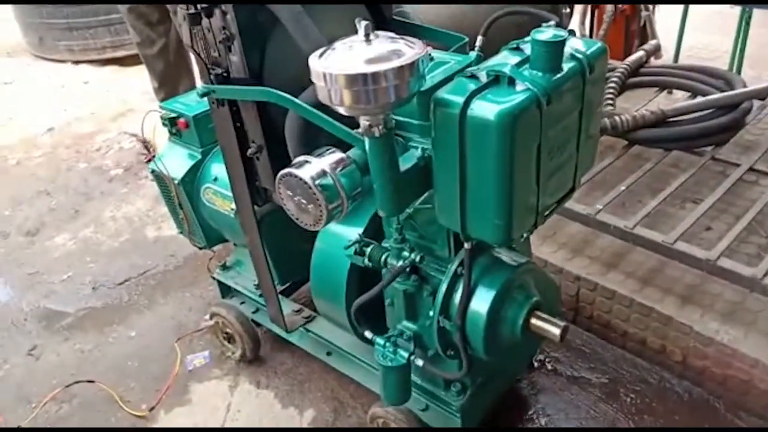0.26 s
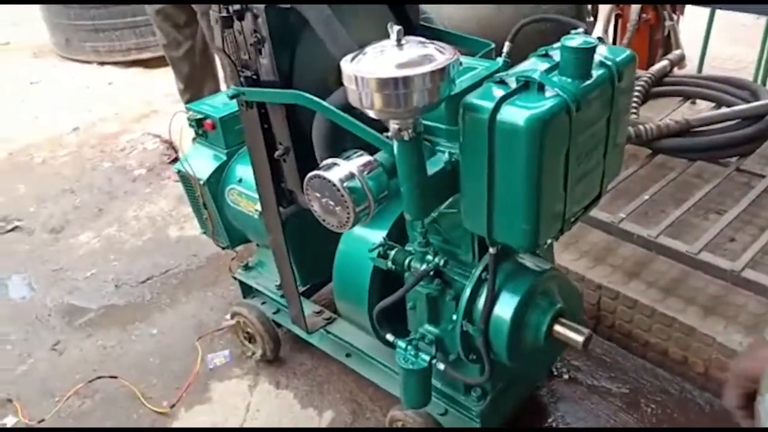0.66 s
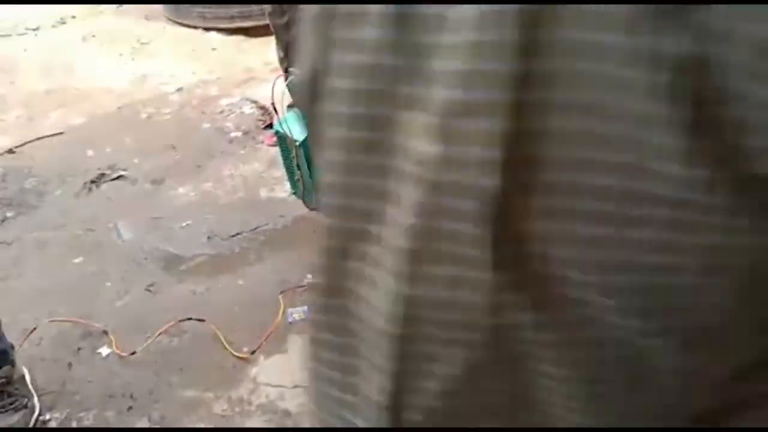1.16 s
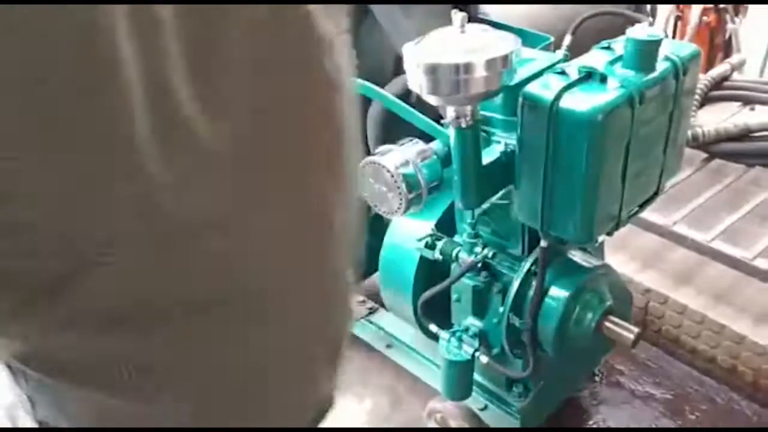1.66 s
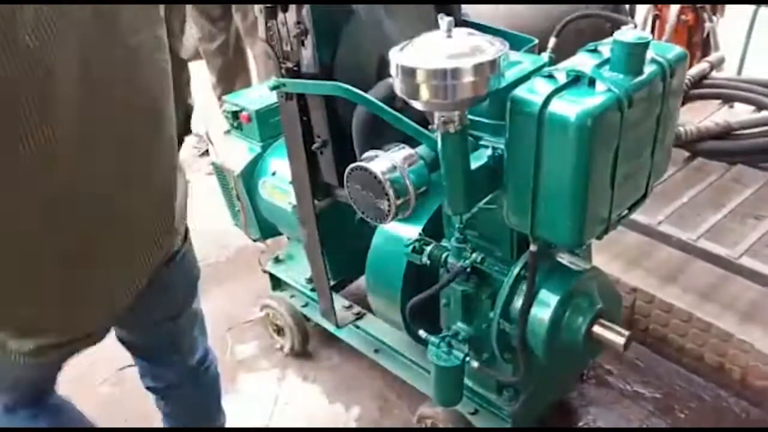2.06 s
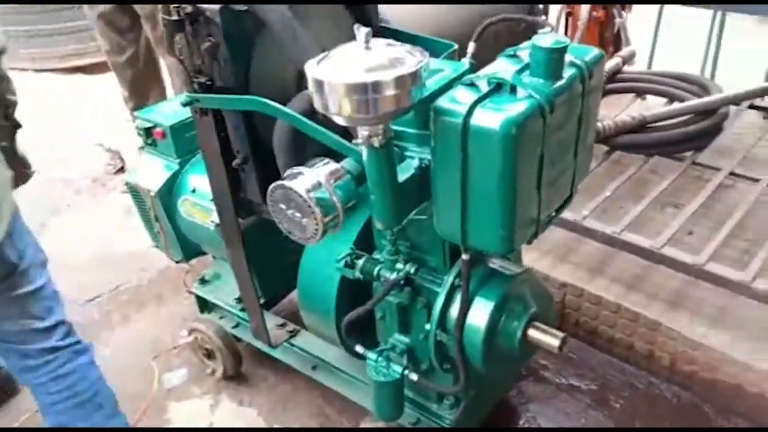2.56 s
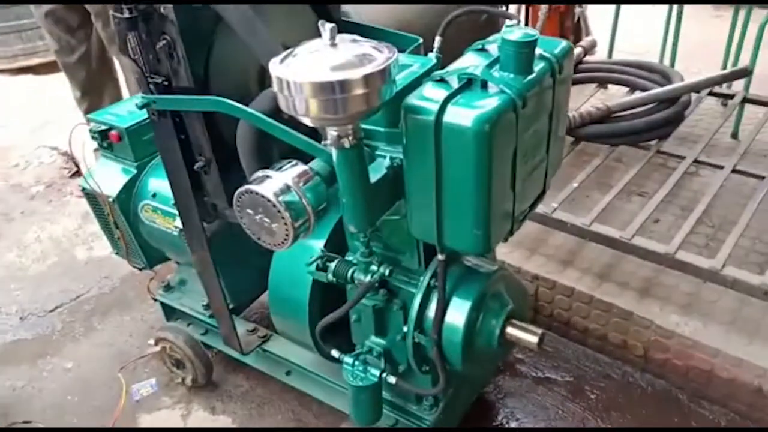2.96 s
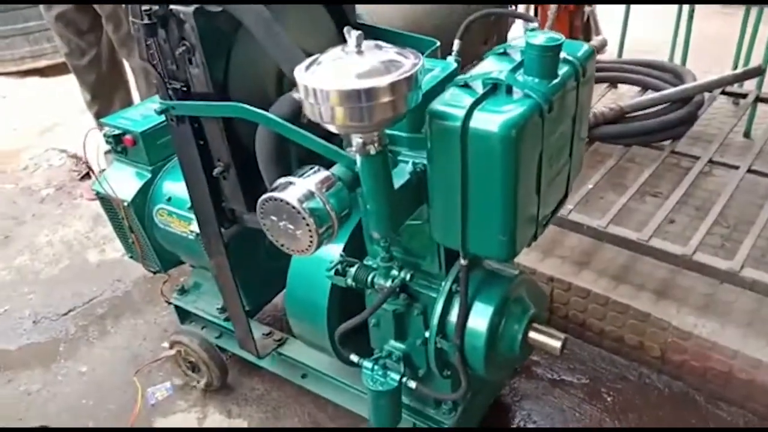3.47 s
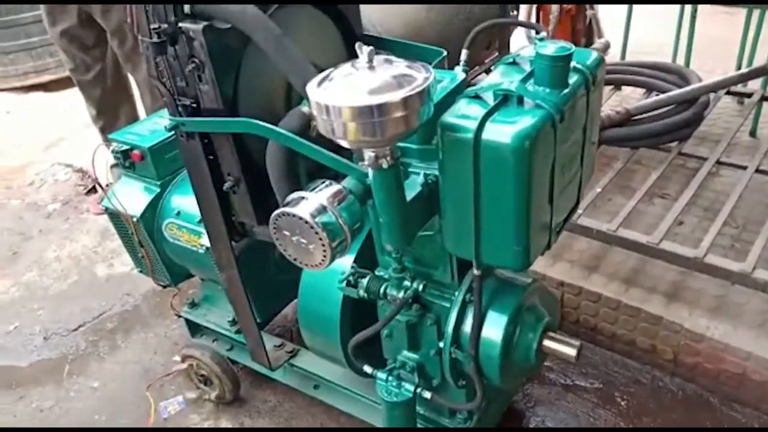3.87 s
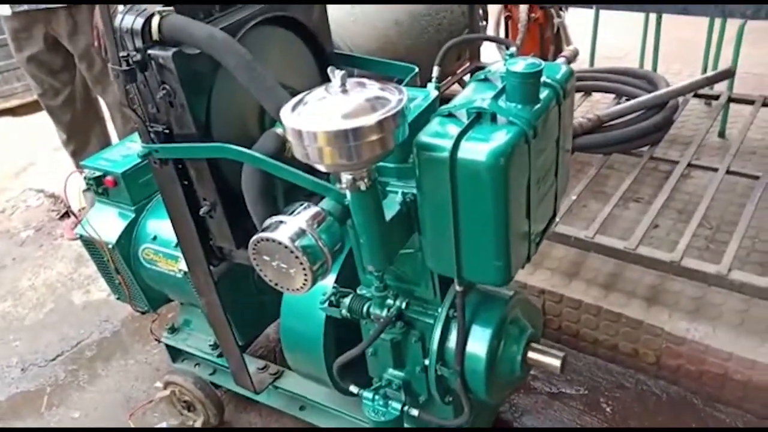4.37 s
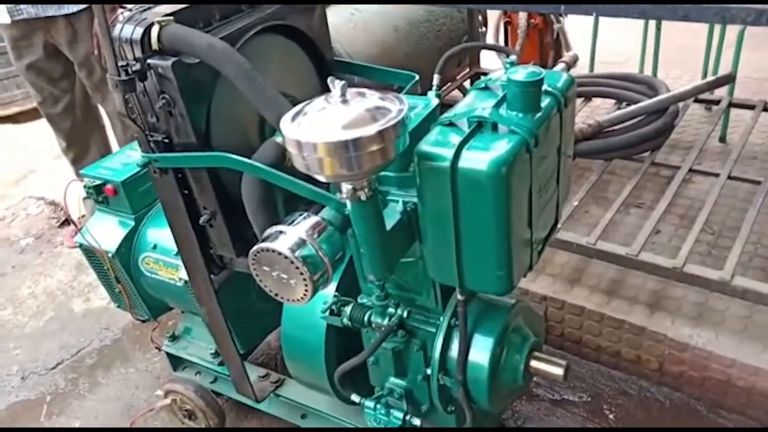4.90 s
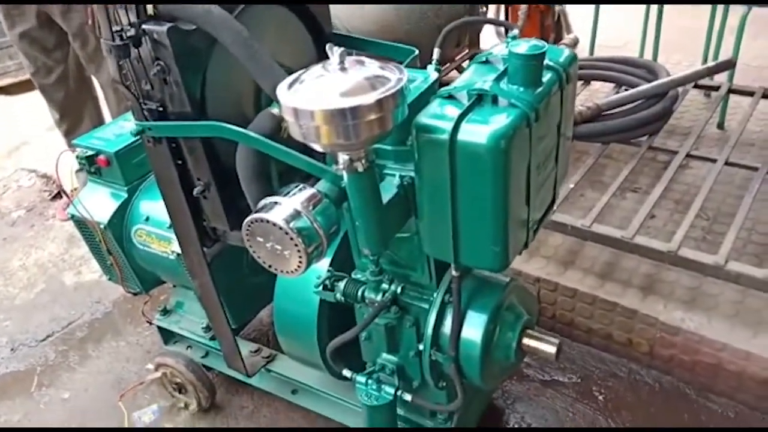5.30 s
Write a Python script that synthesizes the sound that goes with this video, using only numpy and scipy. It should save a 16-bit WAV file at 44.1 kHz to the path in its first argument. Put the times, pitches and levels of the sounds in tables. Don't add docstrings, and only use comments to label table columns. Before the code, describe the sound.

Close, loud diesel engine chugging about twelve beats a second, clanking and puffing, its knock dulled for a couple of seconds, then back stronger.

```python
import sys
import numpy as np
from scipy import signal
from scipy.fft import rfft, irfft
from scipy.io import wavfile
from scipy.ndimage import uniform_filter1d, minimum_filter1d

SR = 44100
rng = np.random.default_rng(int(sys.argv[2]) if len(sys.argv) > 2 else 0)


def master_out(mix):
    frames = np.transpose(np.atleast_2d(mix))
    ceiling = np.clip(frames, -1, 1)
    pcm = np.round(ceiling * 32767).astype(np.int16)
    wavfile.write(sys.argv[1], SR, pcm)


def attenuation_scalar(level_db):
    decades = np.asarray(level_db, float) / 20
    return 10 ** decades


N = 244314

# (frequency [Hz], level [dB], t60 [s])
BLOCK_MODES = [(652, -9, 0.056), (778.3, -7, 0.084), (857.3, -4.5, 0.094), (1045, -8, 0.033),
               (1220, -8, 0.086), (1380, -48, 0.013), (1677, 5, 0.02), (1864, 2, 0.018), (1943, 7.5, 0.011),
               (2139, 2, 0.058), (2249, 6, 0.033), (2307, -2.5, 0.05), (2815, -7.5, 0.011),
               (3226, -12.5, 0.049), (3690, -4.5, 0.018), (4220, -6, 0.031)]
# (time [ms], level [dB])
BLOWS_PER_FIRING = [
    (.3, -10),
    (1.2, -3),
    (2.2, 0),
    (4.2, -1.5),
    (7.4, -1.5),
    (10.5, -10),
    (20.5, -13),
]
# (time [s], speed [rpm])
CRANK_SPEED = [(0.0, 1472.1), (0.33, 1534.6), (0.55, 1532.3), (0.81, 1501.6), (1.29, 1541.3),
               (1.95, 1565.4), (2.08, 1554.0), (2.52, 1488.3), (2.98, 1474.2), (3.36, 1526.4),
               (3.96, 1488.5), (4.33, 1496.7), (5.06, 1504.3), (5.54, 1499.4)]
# (time [s], effort [dB])
FUEL_EFFORT = [(0, -0.5), (.12, 0.5), (.36, 0), (.5, -3), (.92, -2), (1.06, -4), (1.45, -5.5), (1.82, -2.5),
               (2.25, -4.5), (2.6, -2.5), (2.88, 2.5), (3.15, 2), (3.5, -0.5), (3.85, -1), (4.3, 2),
               (4.8, 2), (5.05, 0), (5.54, 0.5)]
# (time [s], block shaded [dB], muffler shaded [dB])
PASSER_BY_SHADE = [(.55, -4, -0.5), (.9, -5, -0.5), (1.06, -6, -3.5), (1.2, -3.5, -4), (1.45, -2, -5.5),
                   (1.62, -3, -2), (2.3, -4.5, -2), (2.7, -3, -0.5)]
# (time [s], lasting [s], frequency [Hz], level [dB])
BACK_REFLECTION = (1.24, 0.2, 874, 9.8)
# (time [s], lead [ms])
PIPE_LEAD = [
    (2.4, .7),
    (3.2, 1.4),
]
# (time [s], delay [ms])
FLOW_DETOUR = [
    (1.1, 0),
    (1.14, 4.2),
    (1.42, 3.6),
    (1.46, 0),
]
# (time [ms], roar level [dB], hiss level [dB])
EXHAUST_FLOW = [(-40, -20, -22), (-37, -19, -14.5), (-21.8, -19, -26), (-19.8, 1.5, 1.5), (-12, -2, .5),
                (-4, -5.5, -2), (2, -8.5, -10), (14, -10.5, -12), (40, -20, -22)]
# (frequency [Hz], level [dB])
ROAR_SPECTRUM = [(120, -2), (300, 1.5), (600, -0.5), (1200, -0.5), (2200, 0), (3500, -1.5), (4700, -10),
                 (5700, -21.5), (7000, -25)]
# (frequency [Hz], level [dB])
HISS_SPECTRUM = [(3500, -8.5), (5200, -6.5), (6300, -13.5), (7400, -9.5), (8600, -1), (10700, -12.5),
                 (13000, -3.5), (15000, -3.5), (16000, -6)]
# (frequency [Hz], level [dB], t60 [s], polarity [+1 or -1])
INTAKE_MODES = [(75, -44, .4, 1), (95, -42, .12, 1), (153, -50, .25, 1), (186, -47.5, .13, 1),
                (222, -50.5, .07, 1), (281, -53, .055, 1), (345, -66, .3, -1), (394, -61, .12, -1),
                (532, -42, .3, -1), (591, -56, .35, -1)]
# (frequency [Hz], level [dB])
BUFFET_SPECTRUM = [(15, -45), (30, -22), (50, -8), (80, -1), (140, -1), (200, -9), (320, -26)]
# (frequency [Hz], level [dB])
GEARS_SPECTRUM = [(135, -21), (200, 7.5), (400, -3.5), (660, -4), (820, -3.5), (1400, -13), (2000, 0),
                  (2700, -13.5), (4100, -12.5), (5400, -54), (7000, -62)]
# (frequency [Hz], level [dB])
FAN_SPECTRUM = [(4000, -16), (5400, -6), (6500, 10.5), (8400, 13), (10300, -9), (13000, -2), (16000, -0.5)]
# (frequency [Hz], t60 [s])
YARD_DECAY = [(150, 0.083), (1000, 0.53), (4000, 0.067), (12000, 0.18)]
# (rest level [dB], effort [share], block shade [share], muffler shade [share], stroke scatter [dB])
KNOCK_LAW = (-10, 1.24, 1.93, -0.2, 1.65)
# (rest level [dB], effort [share], block shade [share], muffler shade [share], scatter [dB])
ROAR_LAW = (-21, 0.77, -0.03, 1.12, 0.44)
# (rest level [dB], effort [share], block shade [share], muffler shade [share], scatter [dB])
HISS_LAW = (-29, -0.28, 0.9, 1.37, -1.04)
# (rest level [dB], effort [share], block shade [share], muffler shade [share], scatter [dB])
THUMP_LAW = (-10, -0.25, 0.31, 0.7, .4)
# (rest level [dB], effort [share], block shade [share], muffler shade [share], scatter [dB])
BUFFET_LAW = (-35.5, -0.25, 0.9, 2.7, 6)
# (rest level [dB], effort [share], block shade [share], muffler shade [share], scatter [dB])
GEARS_LAW = (-21.5, -0.23, 0.63, 0.16, .5)
# (rest level [dB], effort [share], block shade [share], muffler shade [share], scatter [dB])
FAN_LAW = (-44.5, .35, .1, .1, .3)

FIRST_CYCLE = -.376
RAM_DB_PER_RPM = .05
LINGER = .03


def knock(drift_ms=.11, trim_db=-3.5, loud_db=-9.5, bend_hz=1130.0):
    s = strokes(0)
    db = level(KNOCK_LAW, s)
    ms, blow_db = np.transpose(BLOWS_PER_FIRING)
    wander = rng.standard_normal((len(s), len(ms))).T
    wander = evened(uniform_filter1d(wander, size=15, axis=1))
    at = s + (ms[:, None] - 1 + drift_ms * wander) / 1000
    mirror_s, mirror_width_s, mirror_hz, mirror_db = BACK_REFLECTION
    out = np.zeros(N)
    for hz, mode_db, t60 in BLOCK_MODES:
        jitter, size, slow = rng.standard_normal((len(s), len(ms), 3)).T
        beam = evened(uniform_filter1d(slow[0], size=11))
        size = .6 * size + 1.2 * beam
        phase = .9 * rng.standard_normal((len(ms), 1)) + .18 * jitter
        shade_db = (db - loud_db) / (1 + (bend_hz / hz) ** 2)
        off_time = (s - mirror_s) / mirror_width_s
        off_pitch = np.log(hz / mirror_hz)
        shade_db += mirror_db * np.exp(-off_time ** 2 - (off_pitch / 0.066) ** 2)
        strength_db = loud_db + shade_db + blow_db[:, None] + mode_db + size
        strength = attenuation_scalar(strength_db) * np.exp(1j * phase)
        out += ring(train(at.ravel(), strength.ravel()), hz, t60)
    return attenuation_scalar(trim_db) * dulled(dulled(out))


def exhaust(push_db=-25.5, cough_db=-13.5, pop_hz=850.0, roar_db=7.0, hiss_db=4.5):
    ms, roar_flow, hiss_flow = np.transpose(EXHAUST_FLOW)
    gust = evened(uniform_filter1d(rng.standard_normal(N), size=60))
    late = since_thump() - np.interp(np.arange(N) / SR, *np.transpose(FLOW_DETOUR))
    roar_level = np.interp(late, ms, roar_flow) + roar_db + 0.74 * gust
    roar = attenuation_scalar(roar_level) * noise(ROAR_SPECTRUM, patchy_db=2.2)
    s = breaths()
    blow_db = level(ROAR_LAW, s)
    blow_gain = per_breath(s, blow_db)
    fall = 1 - LINGER * (20 * np.log10(blow_gain) - ROAR_LAW[0])
    hiss_level = fall * np.interp(late, ms, hiss_flow) + hiss_db + 1.45 * gust
    hiss = attenuation_scalar(hiss_level) * noise(HISS_SPECTRUM, patchy_db=1.2)
    crack_db = blow_db + 2 * rng.standard_normal(len(s))
    t = np.arange(300) / SR
    pop = np.cos(2 * np.pi * pop_hz * t) * np.exp(-t / 0.0018) * (1 - np.exp(-t / .00008))
    pops = signal.oaconvolve(train(s - .0215, attenuation_scalar(crack_db + 11)).real, pop)[:N]
    pops -= ring(train(s - .022, attenuation_scalar(push_db + 0 * s)), 85.0, 0.052)
    pops += ring(train(s - .0235, attenuation_scalar(cough_db + 0.63 * (blow_db + 25))), 278.0, 0.015)
    return roar * blow_gain + hiss * per_breath(s, level(HISS_LAW, s)) + pops


def thump(trim_db=11.5, hum_db=-1.05, lid_db=-16.5):
    s = breaths()
    rpm = np.interp(s, *np.transpose(CRANK_SPEED))
    db = level(THUMP_LAW, s) + RAM_DB_PER_RPM * (rpm - 1500)
    t = np.arange(410) / SR
    swing = np.sin(np.pi * t / t[-1]) ** 2.1 * np.sin(2 * np.pi * 303 * t)
    seat = .55 * np.sin(2 * np.pi * 326 * t) * np.exp(-t / .0004)
    beats = train(s + .012, attenuation_scalar(db)).real
    gulp, tick = (advanced(signal.oaconvolve(beats, pulse), .012) for pulse in (swing, seat))
    hum = np.zeros(N)
    for hz, mode_db, t60, sign in INTAKE_MODES:
        hum += sign * attenuation_scalar(mode_db + hum_db) * ring(gulp, hz, t60)
    lid = attenuation_scalar(lid_db) * advanced(ring(beats, 530.0, 0.022), .0075)
    return attenuation_scalar(trim_db) * (gulp + tick + hum + lid)


def buffet(trim_db=4., rest_db=-55.):
    puff = np.exp(-((since_thump() + 12) / 10) ** 2)
    s, eddies = breaths(), noise(BUFFET_SPECTRUM)
    eddies = eddies / np.sqrt(uniform_filter1d(eddies ** 2, size=1100) + 0.018)
    puff_gain = attenuation_scalar(trim_db) * puff * per_breath(s, level(BUFFET_LAW, s))
    return (puff_gain + attenuation_scalar(rest_db)) * eddies


def clatter(ticks_per_s=1300.0, ticks_db=-7.0, trim_db=-3.0, fan_db=-6.5):
    s = strokes(0)
    t = np.arange(N) / SR
    gears, fan = (attenuation_scalar(np.interp(t, s, level(law, s))) for law in (GEARS_LAW, FAN_LAW))
    ticks = rng.standard_normal(N) * (rng.random(N) < ticks_per_s / SR)
    rattle = dulled(sum(attenuation_scalar(.5 * mode_db) * ring(ticks, hz, t60) for hz, mode_db, t60 in BLOCK_MODES))
    wash = noise(GEARS_SPECTRUM, patchy_db=1.5) + attenuation_scalar(ticks_db) * evened(rattle)
    return attenuation_scalar(trim_db) * gears * wash + attenuation_scalar(fan_db) * fan * noise(FAN_SPECTRUM, patchy_db=3.0)


def yard(x):
    taps = np.zeros(SR // 2)
    at = np.arange(200, len(taps) - 20, 20)
    taps[at + rng.integers(0, 20, len(at))] = rng.choice([-1., 1.], len(at))
    hz, t, z = signal.stft(taps, SR, nperseg=256)
    decay = attenuation_scalar(-60 * t / read(YARD_DECAY, hz)[:, None])
    tail = signal.istft(z * decay, SR, nperseg=256)[1]
    return signal.fftconvolve(x, tail / np.linalg.norm(tail))[:N]


def strokes(share):
    t = np.arange(-SR // 4, N + SR // 4) / SR
    cycles = np.cumsum(np.interp(t, *np.transpose(CRANK_SPEED))) / 120 / SR
    cycles += FIRST_CYCLE - np.interp(0, t, cycles)
    return np.interp(np.arange(-1, cycles[-1] - 2) + share, cycles, t)


def breaths():
    s = strokes(.5)
    return s - np.interp(s, *np.transpose(PIPE_LEAD)) / 1000


def since_thump():
    s, t = breaths(), np.arange(N) / SR
    cycle = np.maximum(np.searchsorted(s - .04, t) - 1, 0)
    return 80 * (t - s[cycle]) / np.gradient(s)[cycle]


def level(law, s):
    rest_db, by_effort, by_block, by_muffler, scatter_db = law
    at, block_db, muffler_db = np.transpose(PASSER_BY_SHADE)
    db = rest_db + by_effort * np.interp(s, *np.transpose(FUEL_EFFORT))
    db += by_block * np.interp(s, at, block_db) + by_muffler * np.interp(s, at, muffler_db)
    return db + scatter_db * rng.standard_normal(len(s))


def per_breath(s, db):
    cycle = np.searchsorted(s - .024, np.arange(N) / SR) - 1
    return uniform_filter1d(attenuation_scalar(db[np.maximum(cycle, 0)]), size=90)


def train(s, size):
    at, out = np.round(s * SR).astype(int), np.zeros(N, complex)
    inside = (at >= 0) & (at < N)
    np.add.at(out, at[inside], size[inside])
    return out


def ring(drive, hz, t60):
    pole = np.exp((2j * np.pi * hz - np.log(1000) / t60) / SR)
    return signal.lfilter([1], [1, -pole], drive).imag


def advanced(x, lead_s):
    return np.pad(x[round(lead_s * SR):], (0, N))[:N]


def dulled(x, top_hz=3990.0):
    return signal.sosfilt(signal.butter(4, [330, top_hz], "band", fs=SR, output="sos"), x)


def noise(colour, patchy_db=0.):
    frames = N // 128 + 9
    a, b, patches = rng.standard_normal((frames, 257, 3)).T
    patches = uniform_filter1d(uniform_filter1d(patches, size=5, axis=0), size=3, axis=1)
    grains = (a + 1j * b) * attenuation_scalar(patchy_db * evened(patches))
    white = signal.istft(grains, nperseg=512, noverlap=384)[1][:N]
    tilt = attenuation_scalar(read(colour, np.fft.rfftfreq(N, 1 / SR)))
    return evened(irfft(rfft(white) * tilt, N))


def evened(x):
    return x / np.sqrt(np.mean(x ** 2) + 1e-20)


def read(points, hz):
    f, value = np.transpose(points)
    return np.interp(np.log(hz + 1), np.log(f + 1), value)


def scene():
    engine = knock() + exhaust()
    return (engine + attenuation_scalar(-17.5) * yard(engine) + thump() + clatter() + buffet())[None]


def roll_off(x):
    return signal.sosfilt(signal.butter(12, 16800, fs=SR, output="sos"), x)


def record(dry):
    cut = signal.sosfiltfilt(signal.butter(2, 46, "high", fs=SR, output="sos"), dry, padtype="even")
    room_left = minimum_filter1d(np.minimum(.84 / (abs(cut) + 1e-9), 1), size=161)
    held = cut * uniform_filter1d(uniform_filter1d(room_left, size=81), size=81)
    band_limit = signal.firwin(255, 15620, window=("kaiser", 9), fs=SR)[None]
    mix = signal.oaconvolve(held, band_limit, "same")
    return roll_off(mix)


dry = scene()
out = record(dry)
master_out(out)
```